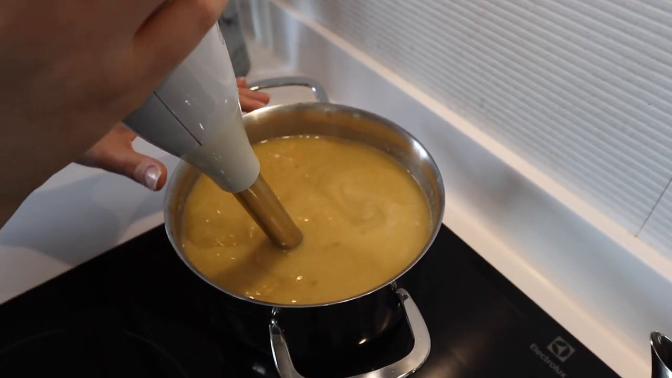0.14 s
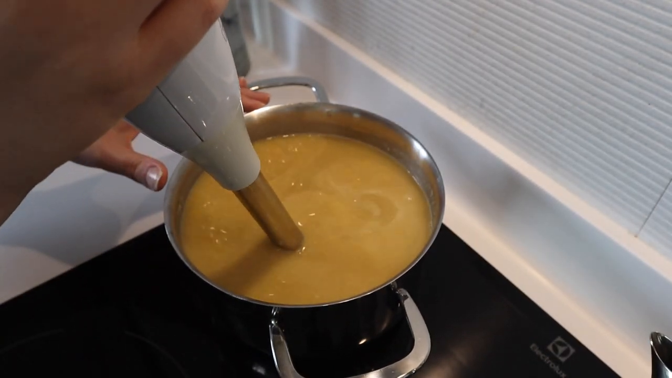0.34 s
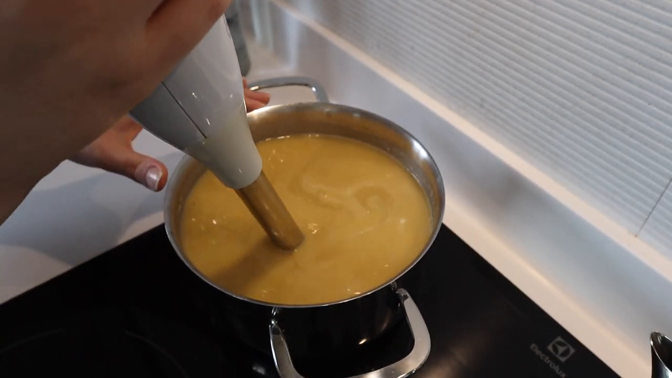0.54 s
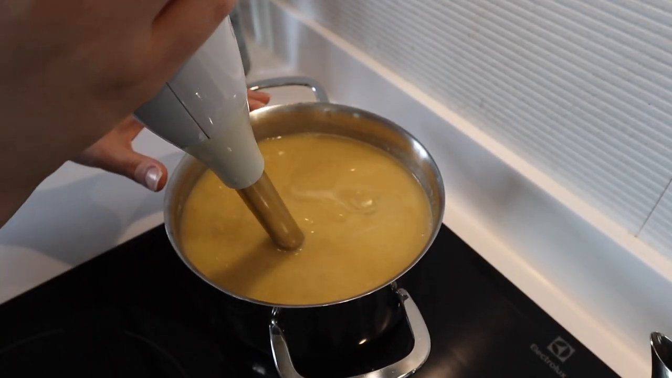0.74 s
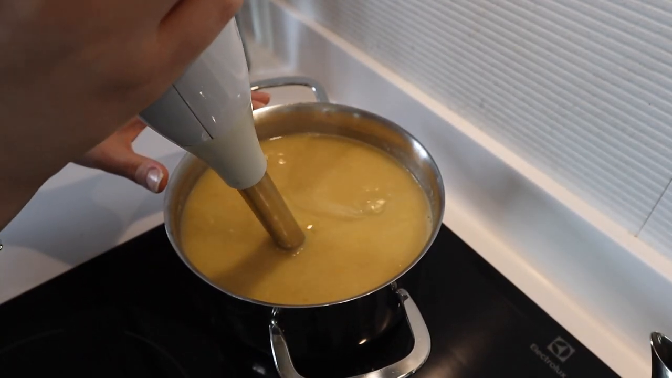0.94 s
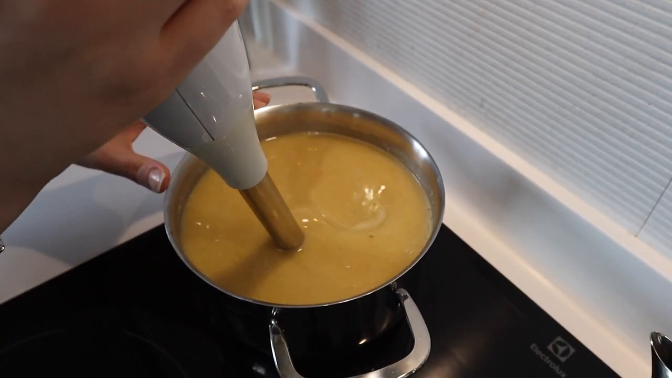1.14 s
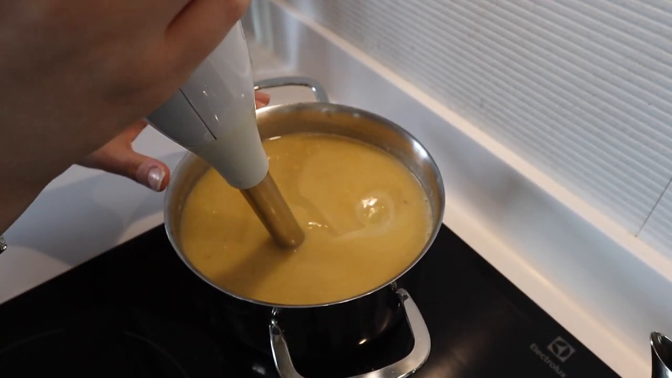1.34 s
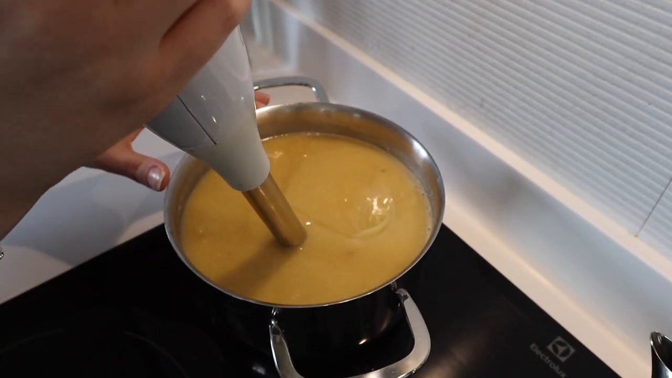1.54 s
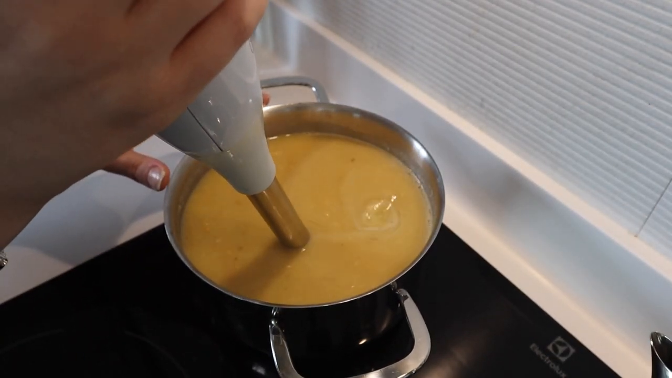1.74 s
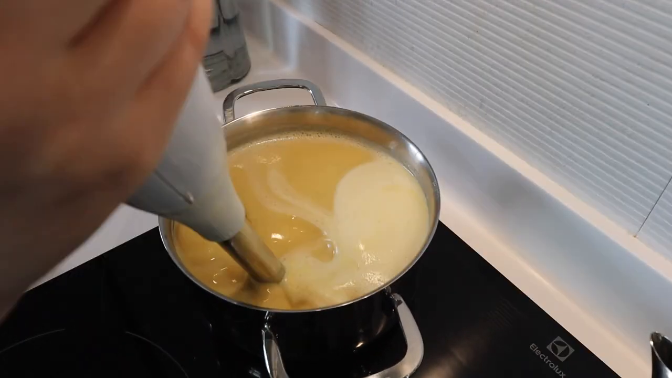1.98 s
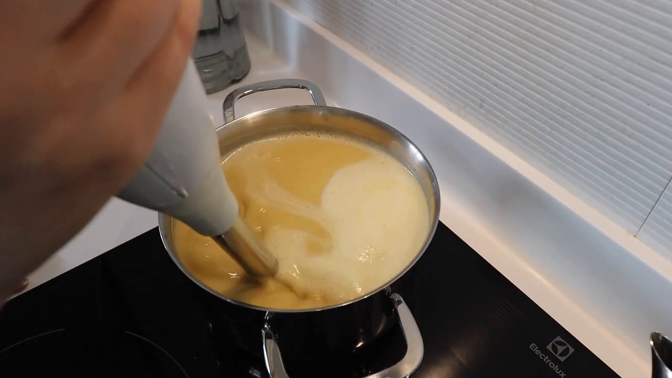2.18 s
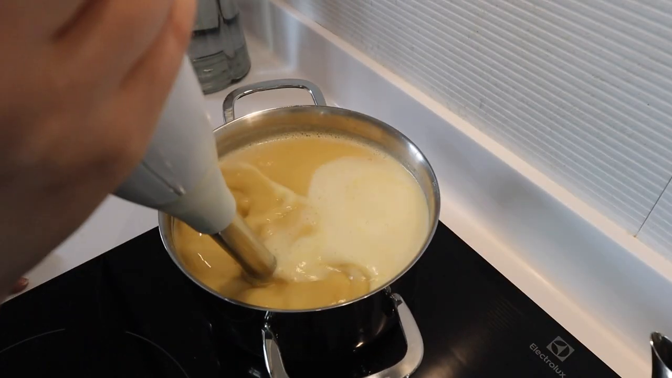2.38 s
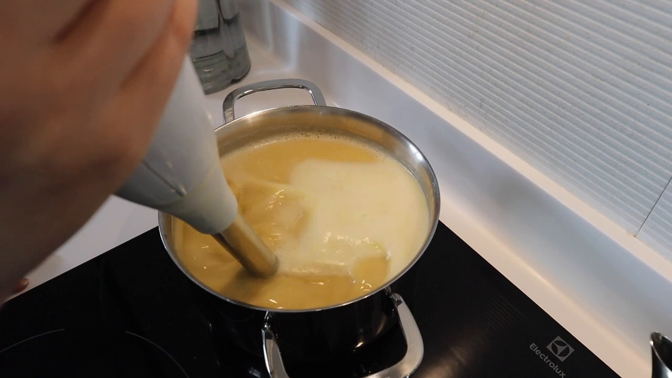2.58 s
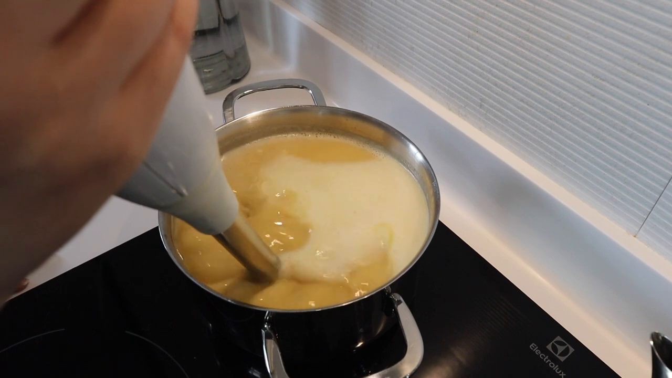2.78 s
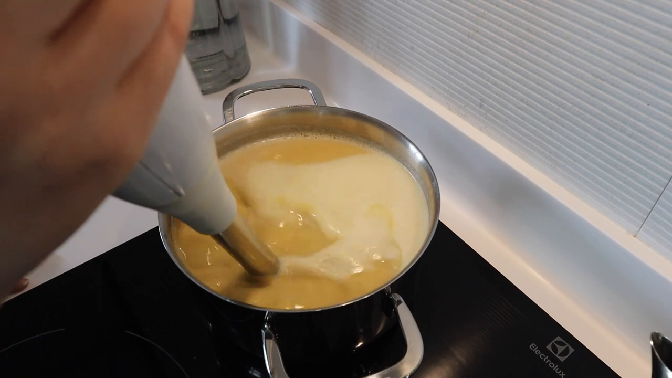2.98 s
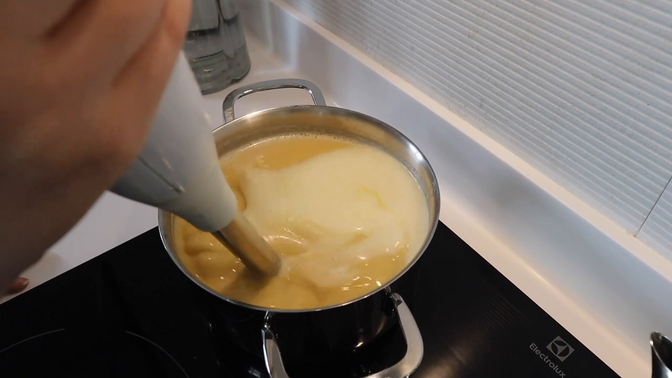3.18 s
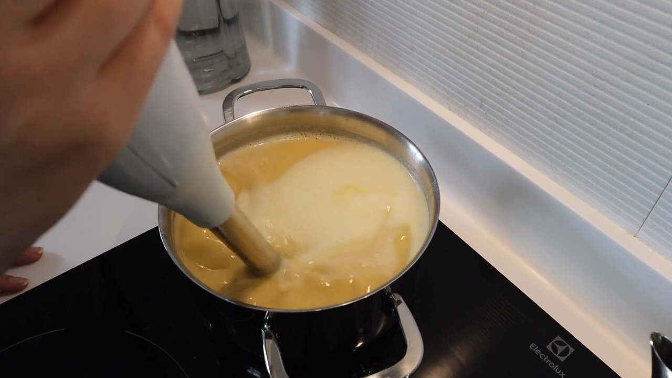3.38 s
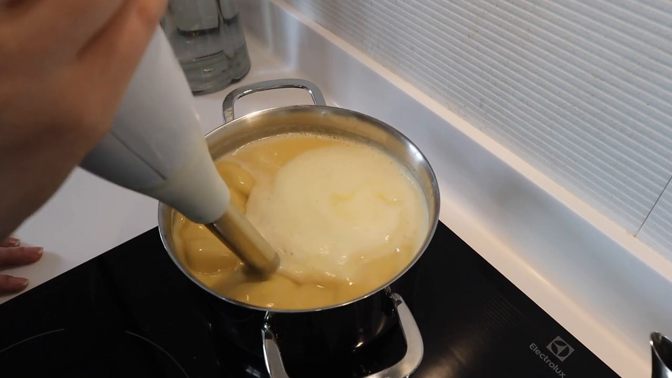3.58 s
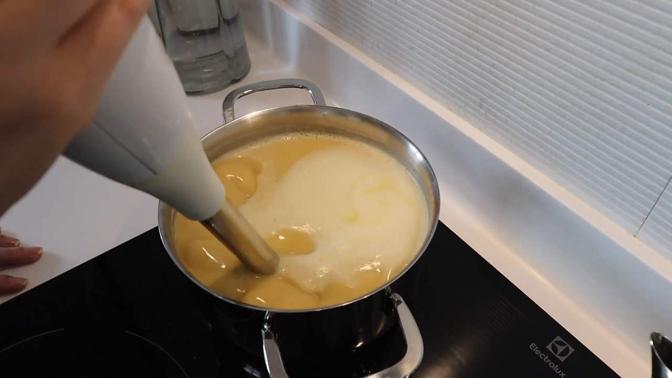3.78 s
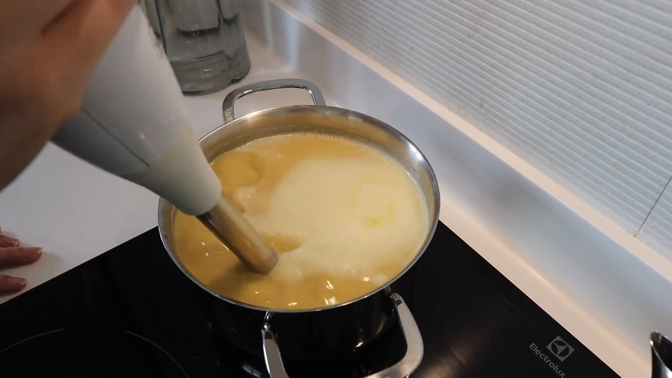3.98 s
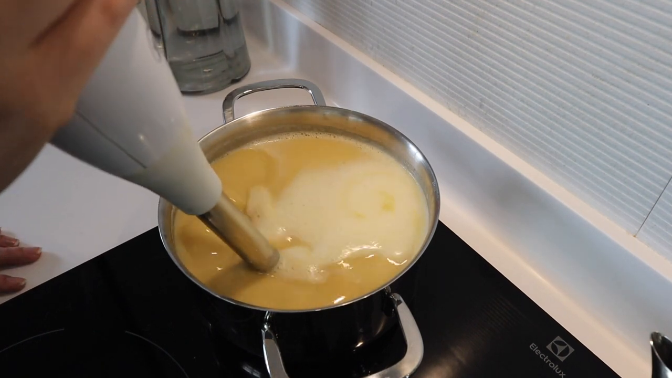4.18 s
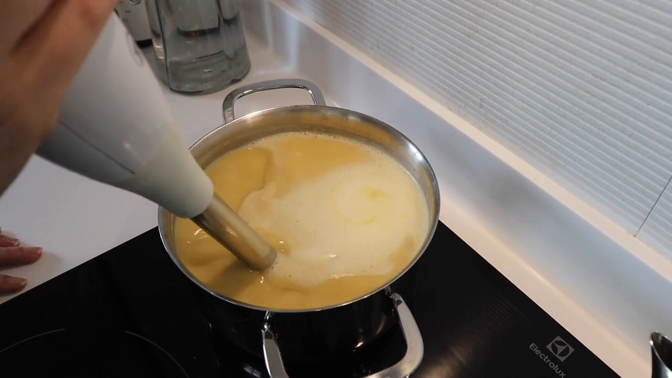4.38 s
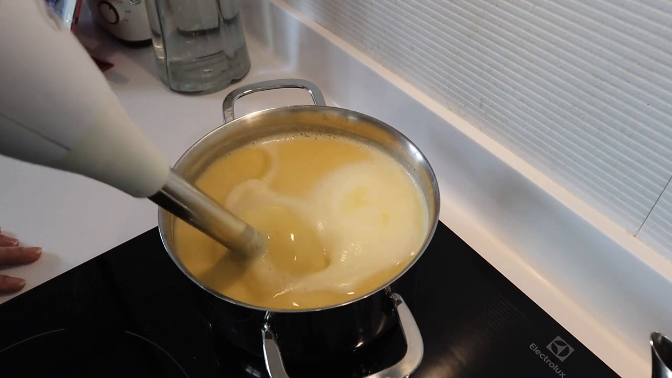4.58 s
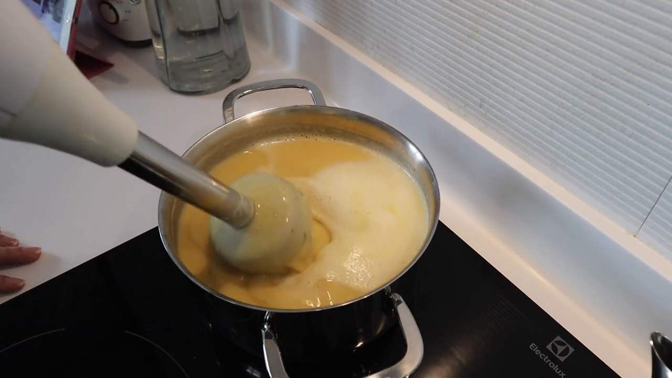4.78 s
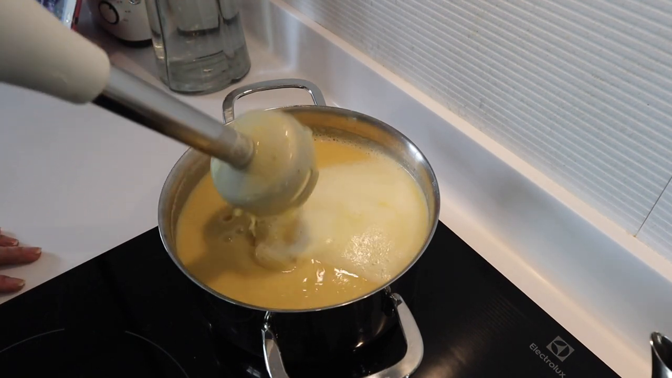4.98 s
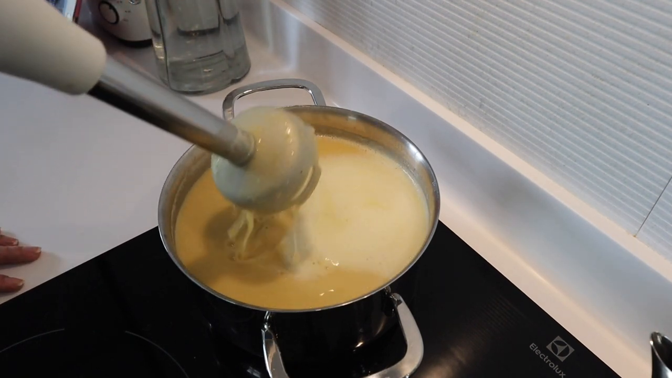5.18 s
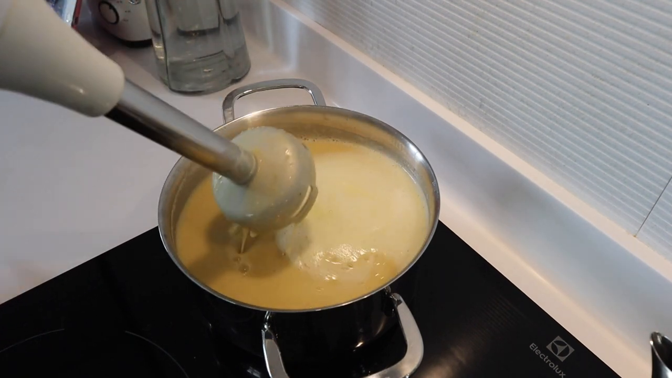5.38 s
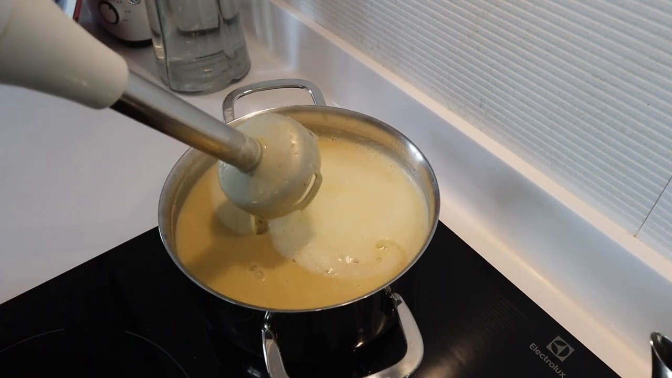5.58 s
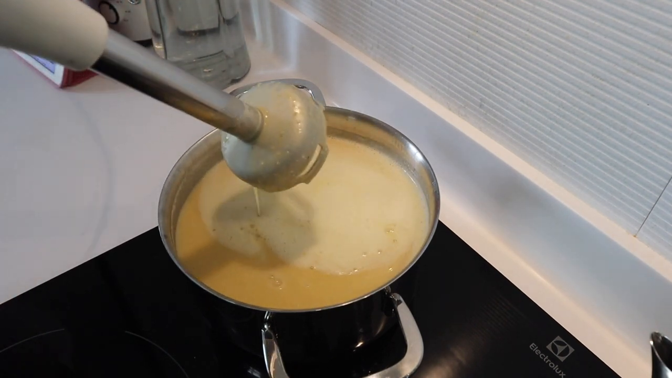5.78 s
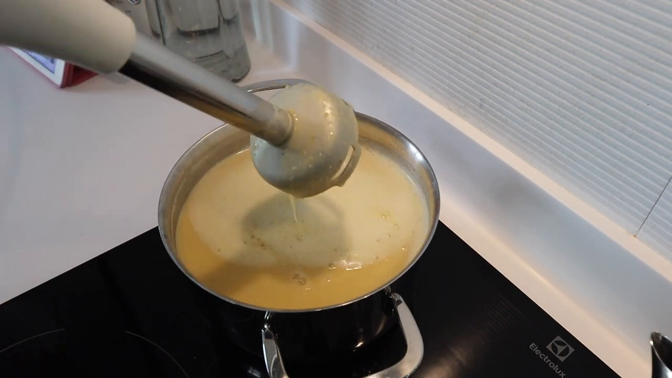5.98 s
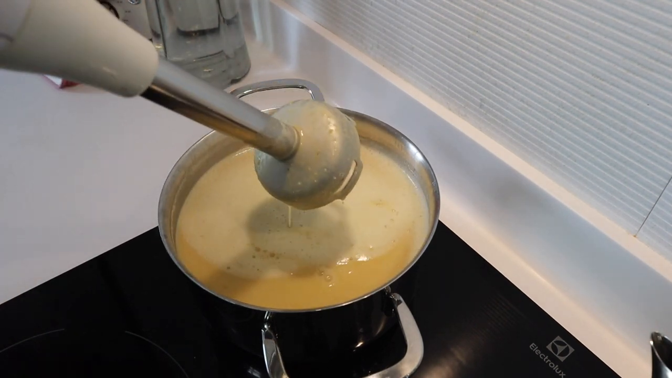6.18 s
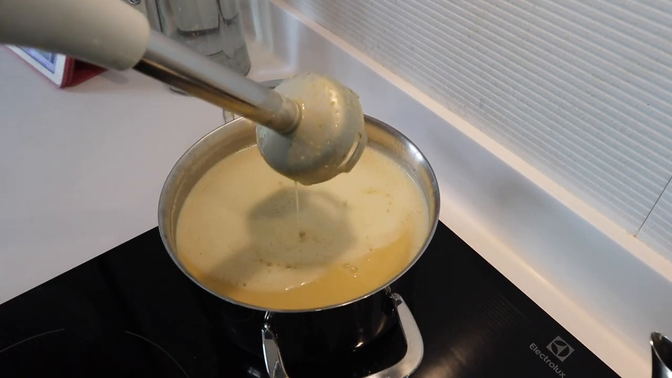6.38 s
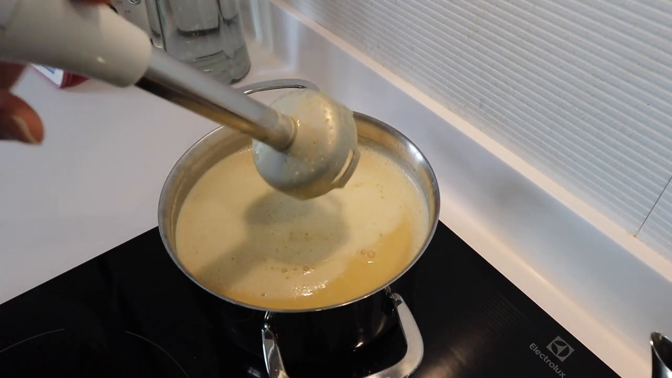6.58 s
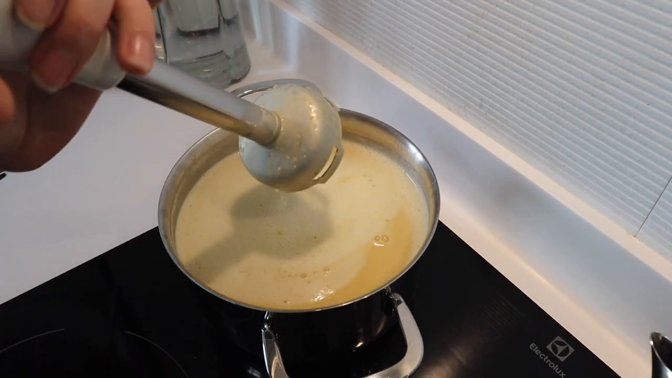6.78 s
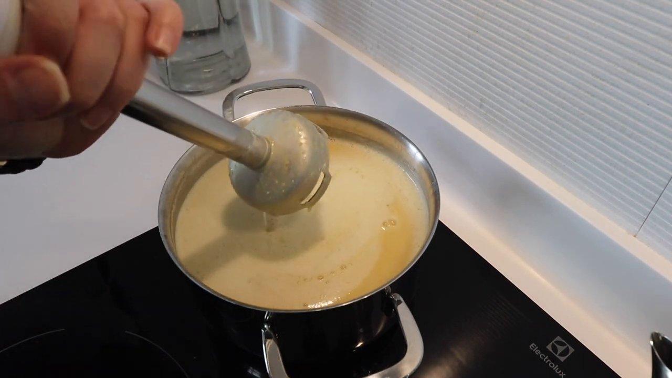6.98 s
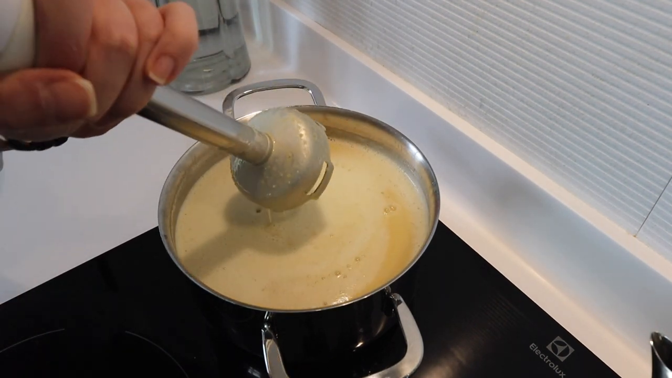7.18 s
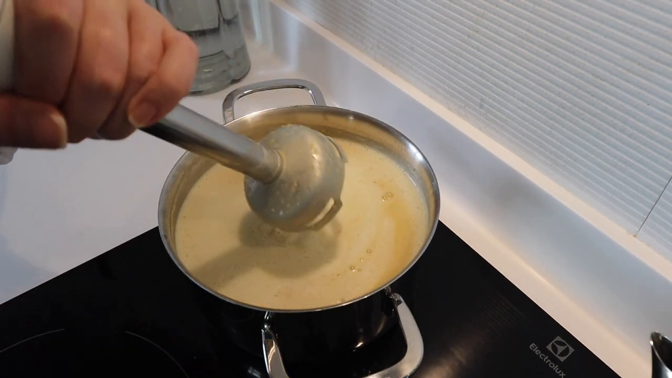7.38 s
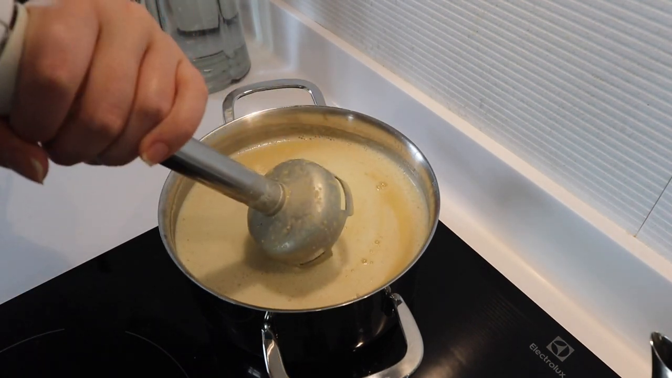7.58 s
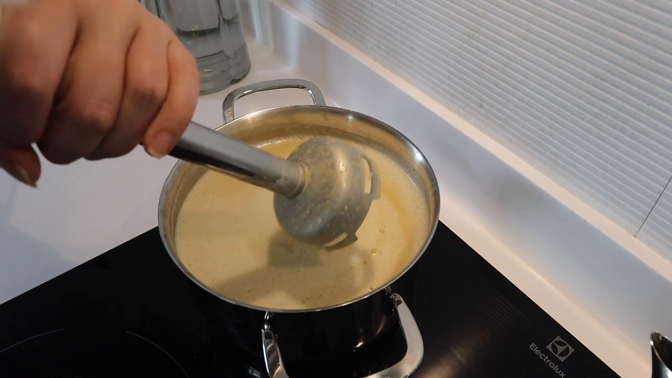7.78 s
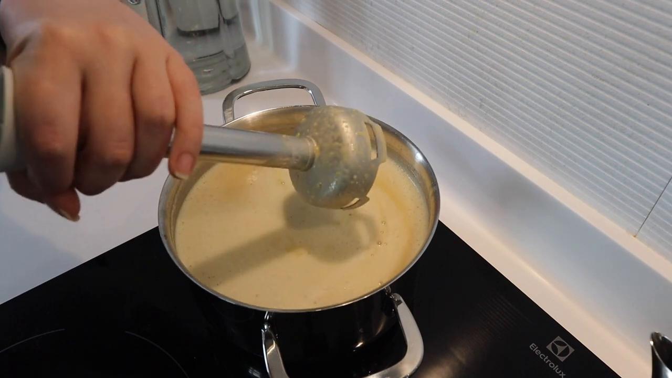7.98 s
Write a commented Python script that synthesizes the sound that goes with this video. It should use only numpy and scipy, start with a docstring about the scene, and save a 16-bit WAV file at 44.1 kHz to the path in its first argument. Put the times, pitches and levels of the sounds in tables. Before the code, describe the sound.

A stick blender growls and whines deep in a pot of soup, pauses briefly, runs again, winds down, then plastic clicks and one steel ring.

```python
"""Stick blender in a soup pot

A blender runs deep in the soup, is let go for a moment, runs again nearer the surface and winds down.
Blade and shaft hum, buzz, crackle and churn; the motor's brushes whine and hiss; each follows one shaft speed.
Short bands glide, soup drips, the plastic handle clicks and knocks, and the steel shaft rings once.
Filtered noise and two low drones make the kitchen; a close microphone pair hears it all."""
import sys
import numpy as np
from scipy import signal
from scipy.fft import rfft, irfft, next_fast_len
from scipy.io import wavfile
from scipy.ndimage import uniform_filter1d

SR = 44100
rng = np.random.default_rng(int(sys.argv[2]) if len(sys.argv) > 2 else 0)


def store_wav(level_fs):
    """Save 16-bit WAV to argv[1]."""
    pcm = np.round(np.clip(np.atleast_2d(level_fs), -1, 1) * 32767)
    wavfile.write(sys.argv[1], SR, pcm.T.astype(np.int16))


N = 354986
TIME = np.arange(N) / SR
EDGE_HZ = 15600  # upper band limit
RIPPLE_HZ = 100  # mains ripple of the motor
BLADE_GROWTH = 4  # blade sounds grow with this power of the speed


def gain_of(db):
    """Decibels to amplitude gain."""
    return np.exp(np.asarray(db) * (np.log(10) / 20))


def unit_rms(x):
    """Scales x to rms 1."""
    return x / np.sqrt(np.mean(x ** 2) + 1e-20)


def curves(rows):
    """Columns of a table after its time column, joined linearly in time."""
    s, *columns = np.transpose(rows)
    return [np.interp(TIME, s, c) for c in columns]


def spectrum(points, hz):
    """A (frequency, value) table joined linearly in log frequency."""
    f, value = np.transpose(points)
    return np.interp(np.log(hz + 1), np.log(f + 1), value)


def resonance_db(modes, f):
    """Summed lift of (frequency, width, lift) resonances."""
    return sum(db / (1 + (2 * (f - hz) / width) ** 2) for hz, width, db in modes)


def shaped(x, db):
    """Filters x by db, a function of frequency."""
    size = next_fast_len(len(x), True)
    gains = gain_of(db(np.fft.rfftfreq(size, 1 / SR)))
    return irfft(rfft(x, size) * gains, size)[:len(x)]


def coloured_noise(size, db):
    """White noise shaped by db(frequency), rms 1."""
    return unit_rms(shaped(rng.standard_normal(size), db))


def wander(hz):
    """Smooth random signal of rms 1, up to about hz."""
    slow = rng.standard_normal(N // 16 + 2)  # one point per 16 samples
    size = next_fast_len(len(slow))
    f = np.fft.rfftfreq(size, 16 / SR)
    slow = irfft(rfft(slow, size) / (1 + (f / hz) ** 4))
    return unit_rms(np.interp(np.arange(N) / 16, np.arange(len(slow)), slow))


def add(mix, s, sound):
    """Mixes a sound in at s seconds."""
    part = mix[round(s * SR):][:len(sound)]
    part += sound[:len(part)]


def scatter(x, t60_s):
    """Dense reflections: x through decaying noise of energy 1."""
    t = np.arange(SR // 2) / SR
    tail = rng.standard_normal(len(t)) * gain_of(-60 * t / t60_s)
    return signal.oaconvolve(x, tail / np.linalg.norm(tail))[:N]


def hiss(level_db=-70):
    """Faint steady microphone hiss: high, band-shaped noise."""
    colour = [(4000, -11), (9000, -9), (12000, 13), (14500, -21)]  # (frequency [Hz], density [dB per Hz])
    return gain_of(level_db) * coloured_noise(N, lambda f: spectrum(colour, f))


# kitchen rush colour: (frequency [Hz], density [dB per Hz])
ROOM_COLOUR = [(22, -45.5), (46, 7), (70, -10), (100, 2.5), (140, -6), (260, -11.5), (400, -9), (800, -9.5),
               (1400, -15), (2500, -22.5), (4500, -28.5), (8000, -35.5), (11500, -37), (15000, -47)]
# kitchen resonances: (frequency [Hz], width [Hz], lift [dB])
ROOM_RESONANCES = [(181, 14.5, 11), (318, 20, 5.5), (416, 23.5, 2.5), (579, 15, 9.5), (1190, 29, 4)]
# heard level of the kitchen rush, low just after the motor stops, then rising again: (time [s], level [dB])
ROOM_LEVEL = [(4.5, -37.5), (4.9, -48.5), (5.8, -39), (7.4, -40.5), (8.05, -42.5)]


def kitchen(swell_db=1.2):
    """A dull rush of noise with a few soft resonances."""
    rush = coloured_noise(N, lambda f: spectrum(ROOM_COLOUR, f) + resonance_db(ROOM_RESONANCES, f))
    return gain_of(curves(ROOM_LEVEL)[0] + swell_db * wander(17.0)) * rush


# low kitchen tones: (frequency [Hz], level [dB], swell time [s], swell half width [s], swell height [dB])
DRONES = [(96.9, -53, 5.77, 0.76, 10.5), (251.7, -55, 7, 1, 9)]


def drones(waver_hz=17):
    """Two low tones that waver in strength and phase; each swells and sinks once."""
    out = np.zeros(N)
    for hz, db, peak_s, half_s, swell_db in DRONES:
        phase = 2 * np.pi * hz * TIME
        tone = wander(waver_hz) * np.sin(phase) + wander(waver_hz) * np.cos(phase)
        out += gain_of(db + swell_db * np.exp(-((TIME - peak_s) / half_s) ** 2)) * tone
    return out


# casing colour, for grip and handle: (frequency [Hz], density [dB per Hz])
CASING_COLOUR = [(60, -36), (250, -5.5), (700, 2.5), (1500, 1.5), (3200, 6.5), (4200, 6), (5000, 7.5),
                 (6100, 1.5), (7300, 2), (9000, -2), (11500, 5), (13500, 1), (16000, -4)]


def grip(grain_db=3, level_db=-50.5, peak_s=7.5, rise_db_per_s=90, fall_db_per_s=24):
    """Fingers slide along the casing once: faint grainy noise that rises and fades."""
    fade_db = np.maximum(rise_db_per_s * (peak_s - TIME), fall_db_per_s * (TIME - peak_s))
    rub = coloured_noise(N, lambda f: spectrum(CASING_COLOUR, f))
    return gain_of(level_db - fade_db + grain_db * wander(40)) * rub


# wet ticks of soup leaving the bell: (time [s], level [dB], pitch [Hz])
DRIPS = [(4.592, -40, 4300), (4.622, -42.5, 4230), (5.18, -43.5, 11000), (5.333, -42, 9000),
         (5.642, -40.5, 6000), (5.675, -36, 8060), (5.745, -37, 3460), (6.19, -38.5, 10000),
         (6.689, -42.5, 5000)]


def drips(decay_s=0.002, slope_db_per_octave=9):
    """Small wet ticks, each a broad hump of noise around its pitch."""
    out, t = np.zeros(N), np.arange(2048) / SR
    for s, db, hz in DRIPS:
        tick = coloured_noise(len(t), lambda f: -slope_db_per_octave * abs(np.log2((f + 1) / hz)))
        add(out, s, gain_of(db) * tick * np.exp(-t / decay_s))
    return out


# steel modes: (frequency [Hz], relative level [dB], t60 [s])
STEEL_MODES = [(974, -17, .22), (1330, -15, .15), (2030, -7, .14), (2900, -15, .1), (3138, -11, .19),
               (3537, 2, .18), (3590, -7, .06), (3790, -8, .11), (4059, -12, .18), (4269, -7, .07),
               (4490, -14, .11), (4705, -3, .1), (5150, -14, .11), (5448, -12, .14), (5905, -12, .08),
               (6228, -18, .09)]
# contacts of the steel: (time [s], level [dB])
CLANKS = [(5.9422, -23.5), (5.9475, -29)]


def steel(scrape_db=-2, scrape_s=0.014, rise_s=0.0007, wash_db=-12, wash_t60_s=.27):
    """The jolted shaft rings in decaying modes with a short scrape; pot and tiles blur its tail."""
    # (frequency [Hz], density [dB per Hz])
    scrape_colour = [(100, 5), (2500, -11), (3600, 3), (5200, -4), (7000, -16), (12000, -10), (15000, -35)]
    out, t = np.zeros(N), np.arange(SR // 2) / SR
    for s, db in CLANKS:
        ring = sum(gain_of(mode_db - 60 * t / t60_s) * np.sin(2 * np.pi * (hz * t + rng.random()))
                   for hz, mode_db, t60_s in STEEL_MODES)
        scrape = coloured_noise(len(t), lambda f: spectrum(scrape_colour, f)) * np.exp(-t / scrape_s)
        onset = 1 - np.exp(-t / rise_s)
        add(out, s, gain_of(db) * onset * (ring + gain_of(scrape_db) * scrape))
    return out + gain_of(wash_db) * scatter(out, wash_t60_s)


# clicks and knocks of the plastic handle, ring level relative to the crack:
# (time [s], level [dB], decay [s], tilt [dB per octave], ring level [dB], ring frequency [Hz])
CLICKS = [(5.053, -25.5, 0.002, 6.5, -32, 890), (5.8739, -19, .0026, 2, -10, 395),
          (5.8968, -17, 0.0022, -0.5, -31, 900), (6.6955, -33, 0.0033, -9.5, -11, 1500),
          (7.0293, -20, 0.0031, -2, -21, 815), (7.040, -27.5, 0.0028, -5, -22, 800),
          (7.0514, -15.5, 0.0045, 2.5, -35, 800), (7.119, -17, 0.0043, 2.5, -10.5, 863),
          (7.2218, -19.5, 0.0033, -5.5, -5, 552), (7.263, -31, 0.0032, 9, -13.5, 904),
          (7.35, -29, 0.0094, -3.5, -2, 1026), (7.36, -26, 0.0074, -4, 0, 975),
          (7.375, -27, 0.0046, -6, 1, 942), (7.391, -35, 0.0058, -6, 10, 917),
          (7.615, -29, 0.0038, -1, -8, 696), (7.8961, -33, 0.0053, -7, 5, 744),
          (7.907, -32, 0.0088, -6, 4, 682.6), (7.919, -32, 0.0052, -15.5, -4, 640),
          (7.9247, -29, 0.003, 2, -2, 636)]


def handle(ring_s=0.0072, after_db=-21, after_s=0.035):
    """Each click is a short noise crack, a weak shiver of the casing and a hollow ring."""
    out, t = np.zeros(N), np.arange(4096) / SR
    for s, db, decay_s, tilt_db, ring_db, ring_hz in CLICKS:
        crack = coloured_noise(len(t), lambda f: spectrum(CASING_COLOUR, f) + tilt_db * np.log2(1 + f / 700))
        crack *= np.exp(-t / decay_s) + gain_of(after_db) * np.exp(-t / after_s)
        ring = gain_of(ring_db) * np.sin(2 * np.pi * ring_hz * t) * np.exp(-t / ring_s)
        add(out, s, gain_of(db) * (crack + ring))
    return out


# short gliding or steady bands of shaft hum, bell or pot ring and soup slurp, level before the fades:
# (start [s], length [s], first frequency [Hz], last frequency [Hz], width [Hz], level [dB])
GLIDES = [(0.85, .55, 870, 889, 34, -30), (1.446, .05, 660, 586, 60, -31),
          (1.443, 0.07, 410, 432, 55, -31.5), (1.455, 0.087, 188, 178, 18, -22.5),
          (1.47, .28, 2230, 2180, 130, -43), (1.53, .1, 160, 118.8, 30, -28),
          (1.643, .08, 104, 88.5, 21, -25.5), (1.755, 0.14, 169.5, 204, 8.9, -24),
          (4.212, 0.095, 300, 296, 35, -24.5), (4.122, 0.38, 2170, 2150, 160, -34),
          (4.327, 0.095, 112, 88, 23, -30.5), (4.459, .05, 2215, 2167, 60, -41.5),
          (4.513, .18, 1150, 558, 180, -41), (4.5, 0.25, 700, 594.2, 200, -47.5),
          (4.596, .009, 850, 890, 30, -34), (4.637, .06, 943, 995, 90, -43),
          (4.696, 0.068, 885, 885, 59, -45), (4.808, 0.07, 1950, 1730, 199, -59)]


def glides():
    """Narrow bands of hum, ring or slurp that swell once: low-passed noise on a gliding carrier."""
    out = np.zeros(N)
    for s, length_s, first_hz, last_hz, width_hz, db in GLIDES:
        size = round(length_s * SR)
        cycles = np.cumsum(np.geomspace(first_hz, last_hz, size)) / SR
        noise = rng.standard_normal((2, SR))
        b, a = signal.butter(2, width_hz / 2, fs=SR)
        flutter = signal.lfilter(b, a, noise[0] + 1j * noise[1])[-size:]  # settled part
        band = unit_rms((flutter * np.exp(2j * np.pi * cycles)).real)
        add(out, s, gain_of(db) * band * signal.windows.tukey(size, .7))
    return out


# trigger holds: (pressed [s], let go [s], friction afterwards [turns/s lost per s])
RUNS = [(-1, 1.441, 226), (1.733, 4.16, 240.3)]


def coasting():
    """1 while the trigger is let go, 0 under power, with soft edges."""
    powered = sum((TIME >= pressed_s) & (TIME < let_go_s) for pressed_s, let_go_s, _ in RUNS)
    return uniform_filter1d(1. - powered, size=1024)


# mean speed held against the soup: (time [s], speed [turns/s])
LOADED_SPEED = [(.12, 200.6), (.45, 204.8), (.8, 206.3), (1.45, 206), (1.86, 210.5), (1.95, 203.6),
                (3.3, 203.6), (3.55, 204.4), (3.9, 203.6)]


def shaft(spin_up_s=.025, drag_knee_hz=136.03, unsteadiness=.0015):
    """Turns, turns/s and share of full speed: exponential spin-up; soup drag and friction brake it."""
    full, speed = curves(LOADED_SPEED)[0], np.zeros(N)
    for pressed_s, let_go_s, friction in RUNS:
        missing = np.interp(pressed_s, TIME, full - speed)
        lag = missing * np.exp(-np.maximum(TIME - pressed_s, 0) / spin_up_s)
        speed = np.where(TIME >= pressed_s, full - lag, speed)
        # square-law drag exceeds friction above the knee: speed falls as a tangent
        release_angle = np.arctan(np.interp(let_go_s, TIME, speed) / drag_knee_hz)
        angle = release_angle - friction / drag_knee_hz * np.maximum(TIME - let_go_s, 0)
        speed = np.where(TIME >= let_go_s, drag_knee_hz * np.tan(np.maximum(angle, 0)), speed)
    speed = speed * (1 + unsteadiness * wander(12))
    return np.cumsum(speed) / SR, speed, speed / full


# low resonances of bell and pot: (frequency [Hz], width [Hz], relative level [dB])
RATTLE_MODES = [(180, 67, -3), (258, 53, -0.5), (300, 42, -2.5), (375, 45, 1), (439, 31, -3), (605, 75, -3)]


def rattle(pace, level_db=-26, growth=1.33):
    """With the power off, the loose shaft rumbles: noise in the low resonances of bell and pot."""
    def body_db(f):
        return 10 * np.log10(sum(gain_of(db) ** 2 / (1 + (2 * (f - hz) / width) ** 2) ** 2
                                 for hz, width, db in RATTLE_MODES))
    return gain_of(level_db) * coasting() * pace ** growth * coloured_noise(N, body_db)


# bubble crackle colour: (frequency [Hz], density [dB per Hz])
CRACKLE_COLOUR = [(1500, -23), (2800, -5), (4500, -1), (6200, 5), (7800, -8), (12000, -38), (15000, -40)]
# crackle at full speed, strong in the first second, then weaker: (time [s], level [dB])
CRACKLE_LEVEL = [(0, -35), (.3, -33), (.95, -34), (1.05, -41), (1.9, -45)]


def crackle(turns, pace, per_s=1200, size_db=3.3, flutter_db=2):
    """Bubbles collapse behind two blade tips, one more than the other: random impulses gated by the turn."""
    passing = np.cos(2 * np.pi * turns) ** 2 * (2 + np.cos(2 * np.pi * turns))
    struck = rng.random(N) < per_s * passing / SR
    sizes = gain_of(size_db * np.minimum(rng.exponential(1, N), 4))
    pops = unit_rms(shaped(struck * rng.choice([-1, 1], N) * sizes, lambda f: spectrum(CRACKLE_COLOUR, f)))
    level_db = curves(CRACKLE_LEVEL)[0] + flutter_db * wander(30)
    return gain_of(level_db) * pace ** BLADE_GROWTH * pops


# brush hiss at full speed: (time [s], level [dB])
BRUSH_LEVEL = [(0, -35), (.9, -31.5), (1.45, -29.5), (1.95, -36), (3.45, -36.5), (3.8, -41), (4.2, -40),
               (4.5, -40), (4.65, -52)]
# brush hiss colour: (frequency [Hz], density [dB per Hz])
BRUSH_COLOUR = [(4000, -40), (8500, -12), (9500, -6), (9950, -2), (10500, -4), (11500, -2), (12600, -4.5),
                (13500, -17), (14200, -19), (14750, -9), (15200, -33)]


def brushes(turns, pace, throb=0.146, growth=1.0, spark_db=-32, spark_peak_s=0.099):
    """Carbon on copper: high hiss pulsing once a turn, with a spark flare as the motor starts."""
    noise = shaped(rng.standard_normal(N), lambda f: spectrum(BRUSH_COLOUR, f))
    ages = [np.maximum(TIME - pressed_s, 0) / spark_peak_s for pressed_s, _, _ in RUNS]
    sparks = gain_of(spark_db) * sum((age * np.exp(1 - age)) ** 3 for age in ages)
    steady = gain_of(curves(BRUSH_LEVEL)[0]) * pace ** growth
    return (steady + sparks) * unit_rms(noise * (1 + throb * np.cos(2 * np.pi * turns)))


# relative strength of each multiple of the bar rate, from the first: [dB]
BAR_ORDERS = [0, 0, -2, -9, -8, -10, -11, -13]
# housing radiation of the whine: (frequency [Hz], gain [dB])
HOUSING = [(600, -48), (1400, -48), (3000, -43.5), (4650, -43.5), (4900, -35), (5100, -42), (6500, -40),
           (8200, -42), (9800, -36.5), (12300, -30), (13700, -40), (14700, -43), (15300, -56)]
# whine strength, greatest just after the first let-go, still high through the restart:
# (time [s], relative level [dB])
WHINE_LEVEL = [(0, -4), (1.35, -3), (1.5, 4), (1.65, 2.5), (1.75, 3), (1.88, 3), (1.95, .5), (3.1, .5),
               (3.8, -1), (4.15, -1), (4.25, -5.5), (4.5, -6)]


def whine(turns, speed, pace, rough=0.3, chatter=0.85, chatter_hz=180, spread=1.1, ripple=.3,
          uneven_rad=.4, growth=0.56, jitter_bars=.015, coast_jitter_bars=.036):
    """Brushes tick over 24 uneven commutator bars; powered, they chatter with the mains; coasting, run loose."""
    loose = coasting()
    bar_hz = 24 * speed
    bars = 24 * turns + jitter_bars * wander(40) + coast_jitter_bars * loose * wander(200)
    current = (1 - loose) * (1 + ripple * np.cos(2 * np.pi * RIPPLE_HZ * TIME))
    wobble = uneven_rad * (np.sin(2 * np.pi * turns) + np.sin(2 * np.pi * 2 * turns))
    out = np.zeros(N)
    for k, db in enumerate(BAR_ORDERS, 1):
        tone = (1 + rough * wander(130)) * np.sin(2 * np.pi * k * bars + wobble)
        # chatter lies chatter_hz above each line
        skid = np.cos(2 * np.pi * (k * bars + chatter_hz * TIME) + spread * wander(150))
        skid *= chatter * min(k / 2, 1) * current
        radiated = gain_of(db + spectrum(HOUSING, k * bar_hz)) * (k * bar_hz < EDGE_HZ)
        out += radiated * (tone + skid)
    return np.sqrt(2) * out * pace ** growth * gain_of(curves(WHINE_LEVEL)[0])


# shake of the unbalanced shaft as the grip changes, at full speed: (time [s], level [dB])
SHAKE = [(0, -23.5), (.9, -27.5), (2, -28), (2.7, -23.5), (3.25, -22.5), (4.15, -21)]
# blade hum as the bell is moved, at full speed:
# (time [s], level at 2 x shaft speed [dB], level at 3 x [dB], level at 4 x [dB])
BLADE = [(0.05, -32.5, -25, -33), (0.4, -27.5, -24.5, -33.5), (0.9, -39, -30, -41), (1.35, -34, -35, -34.5),
         (1.88, -30, -28, -39), (2.3, -32, -26.5, -30), (2.7, -35.5, -28.5, -32.5), (3.2, -29, -34.5, -29),
         (3.6, -29.5, -31.5, -33), (4.05, -30, -29.5, -31)]


def hum(turns, pace, waver_db=1.0, lowest_hz=100, shaft_growth=1.1, coast_loss_db=4, coast_waver_db=2.5):
    """Unbalanced shaft and blade shake the pot at orders 1 to 4; coasting, they weaken and stumble."""
    levels = [(1, curves(SHAKE)[0], shaft_growth)]
    levels += [(k, db, BLADE_GROWTH) for k, db in enumerate(curves(BLADE), 2)]
    coast_db = coasting() * (coast_waver_db * wander(25) - coast_loss_db)
    out = np.zeros(N)
    for k, db, growth in levels:
        level = gain_of(db + waver_db * wander(9.4) + coast_db) * pace ** growth
        out += level * np.sin(2 * np.pi * (k * turns + rng.random()))
    return np.sqrt(2) * shaped(out, lambda f: -10 * np.log10(1 + (lowest_hz / (f + 1)) ** 6))


# height of the bell in the pot, for buzz and churn: (time [s], height [0 deep to 1 near the surface])
HEIGHT = [(1.5, 0.11), (1.85, 1)]
# blade buzz at full speed near the surface:
# (multiple of shaft speed, level in step with the shaft [dB], level shifted up by the swirl [dB])
BUZZ = [(4, -48, -34), (5, -40, -34.5), (6, -39, -39), (7, -35, -31.5), (8, -38, -38), (9, -45, -42),
        (10, -38, -42), (11, -41, -44), (12, -42, -50)]


def buzz(turns, pace, level_db=0, deep_db=-5.5, waver_db=2.5, swirl_hz=40.8,
         jitter_turns=.012, swirl_jitter_turns=.12, coast_jitter_turns=.08):
    """Blade orders 4 to 12, each with a restless twin raised by the soup's swirl; coasting blurs them."""
    height = np.clip(curves(HEIGHT)[0], 0, 1)
    turns = turns + jitter_turns * wander(12) + coast_jitter_turns * coasting() * wander(60)
    out = np.zeros(N)
    for k, steady_db, swirled_db in BUZZ:
        swirl = swirl_hz * TIME + swirl_jitter_turns * wander(18)
        out += gain_of(steady_db + waver_db * wander(11.9)) * np.sin(2 * np.pi * (k * turns + rng.random()))
        twin = np.sin(2 * np.pi * (k * turns + swirl + rng.random()))
        out += gain_of(swirled_db + waver_db * wander(11.5)) * twin
    return np.sqrt(2) * gain_of(level_db + deep_db * (1 - height)) * pace ** BLADE_GROWTH * out


# churning at full speed: (time [s], relative level [dB])
CHURN_LEVEL = [(0, -17), (.35, -19), (1.45, -21.5), (1.68, -18), (1.8, -19.5), (2.9, -20), (4.15, -21.5),
               (4.35, -21.5)]
# blade and motor noise: (frequency [Hz], density deep [dB per Hz], density near the surface [dB per Hz])
CHURN_COLOUR = [(25, -25, -25), (45, -5, -1), (65, -12, -11), (110, -5, -2), (300, -3.5, 1),
                (510, -9, -7.5), (720, -3, -1.5), (1300, -4.5, -2), (2400, -3, -2), (3400, -12, -11),
                (4400, -11.5, -10), (7800, -22, -22), (11500, -16, -20), (13800, -27, -31)]
# pot and bell resonances: (frequency [Hz], width [Hz], lift deep [dB], lift near the surface [dB])
POT = [(43.3, 7.8, 0, 5), (101.9, 6.3, 1, 11), (265, 25, 4.5, 4.5), (303, 10, 2, 5), (436, 26, 7, 9.5),
       (695, 105, 3, 3.5), (1840, 110, 5.5, 3), (2215, 90, 5.5, 5), (2400, 40, 3.5, 3), (1490, 120, 2, 5),
       (1645, 80, 2, 4), (2680, 80, 6, 3.5), (2855, 90, 7, 3.5), (4160, 200, 1, 6), (4450, 160, 3, 5),
       (5650, 400, 2.5, 3), (6800, 300, 3, 1.5)]


def churn(turns, pace, level_db=1.0, throb=0.12, ripple=0.085, flutter_db=1.1543, growth=2.138):
    """Turbulence throbbing once a turn and with the mains, through pot resonances that change with height."""
    pulsing = 1 + throb * np.cos(2 * np.pi * turns) + ripple * np.cos(2 * np.pi * RIPPLE_HZ * TIME)
    drive = rng.standard_normal(N) * pulsing * gain_of(flutter_db * wander(33))
    colour, pot = np.array(CHURN_COLOUR), np.array(POT)

    def body(column):  # 1 deep, 2 near the surface
        density, modes = colour[:, [0, column]], pot[:, [0, 1, column + 1]]
        return unit_rms(shaped(drive, lambda f: spectrum(density, f) + resonance_db(modes, f)))
    height = np.clip(curves(HEIGHT)[0], 0, 1)
    level = gain_of(level_db + curves(CHURN_LEVEL)[0]) * pace ** growth
    return level * ((1 - height) * body(1) + height * body(2))


# stereo width: (frequency [Hz], side minus mid [dB])
WIDTH = [(60, -72), (110, -31), (200, -24), (400, -8.5), (750, -10), (1300, -4), (2300, 0), (4400, 4.5),
         (8000, 8), (10300, 12), (12000, 25), (14000, 38)]
# stereo balance: (frequency [Hz], left minus right [dB])
BALANCE = [(110, 0), (200, -1), (380, .5), (700, 2), (1290, 4), (2380, 2), (4400, 2), (8000, .5)]


def microphones(x, diffuse, direct):
    """Mid and side of a close pair: low sounds are central; the side level grows towards the treble."""
    def side_share(f):
        return 1 / (1 + gain_of(-2 * spectrum(WIDTH, f)))
    mid = shaped(x, lambda f: 10 * np.log10(1 - side_share(f)))
    # side: direct sound a quarter cycle out of step, plus diffuse sound
    direct = np.clip(direct, 0, 1)
    quarter = signal.hilbert(x, next_fast_len(N)).imag[:N]
    across = np.sqrt(1 - direct ** 2) * diffuse - direct * quarter
    side = shaped(across, lambda f: 10 * np.log10(side_share(f)))
    left = shaped(mid + side, lambda f: spectrum(BALANCE, f) / 2)
    right = shaped(mid - side, lambda f: -spectrum(BALANCE, f) / 2)
    return np.array([left, right])


def scene(room_db=-17, room_t60_s=0.77, dull_hz=6000):
    """Sums tones, rushing noise and knocks, each group with its own diffuseness at the microphones."""
    turns, speed, pace = shaft()
    tones = hum(turns, pace) + buzz(turns, pace) + whine(turns, speed, pace) + glides() + drones()

    def noises():
        return churn(turns, pace) + rattle(pace) + brushes(turns, pace) + kitchen() + grip() + hiss()
    rush, diffuse_rush = noises(), noises()
    knocks = handle() + steel() + drips() + crackle(turns, pace)
    room = shaped(scatter(knocks, room_t60_s), lambda f: -10 * np.log10(1 + (f / dull_hz) ** 2))
    knocks = knocks + gain_of(room_db) * room
    return (microphones(tones, tones, direct=0.99) + microphones(rush, diffuse_rush, direct=0.58)
            + microphones(knocks, scatter(knocks, t60_s=0.016), direct=0.55))


def record(dry):
    """Low-pass at the upper band limit."""
    lowpass = signal.firwin(255, EDGE_HZ, window=("kaiser", 8), fs=SR)
    return signal.oaconvolve(dry, lowpass[None], "same")


dry = scene()
out = record(dry)
store_wav(out)
```